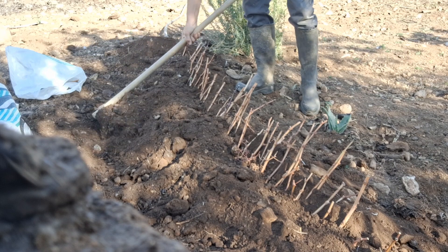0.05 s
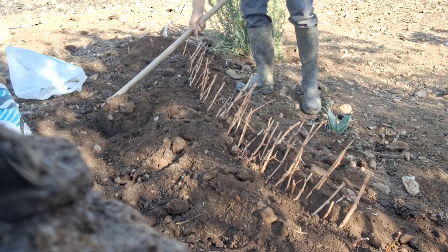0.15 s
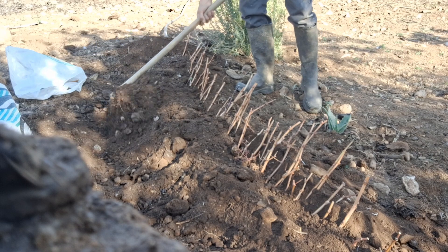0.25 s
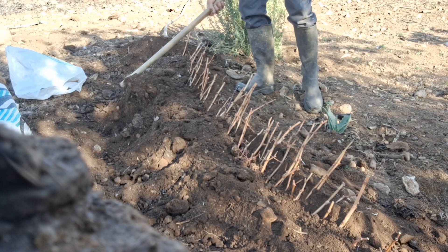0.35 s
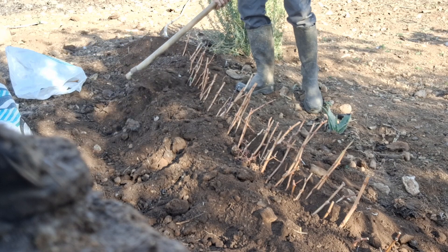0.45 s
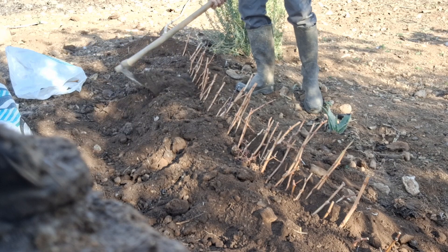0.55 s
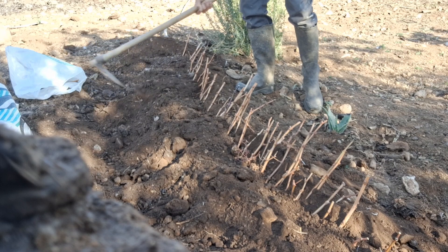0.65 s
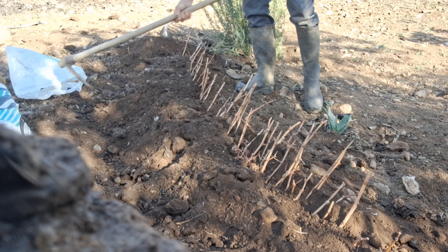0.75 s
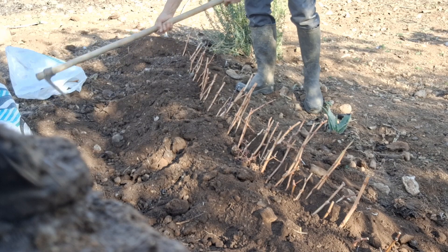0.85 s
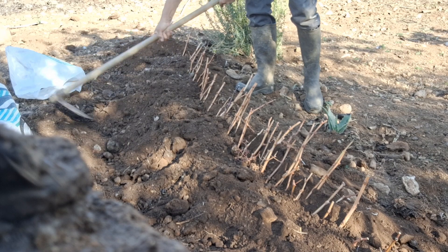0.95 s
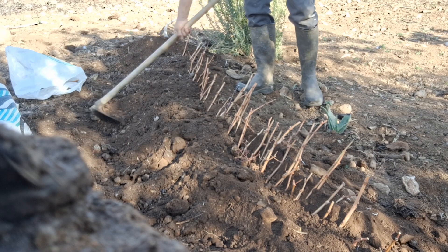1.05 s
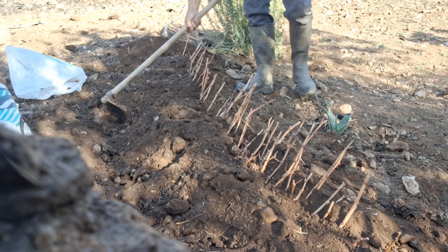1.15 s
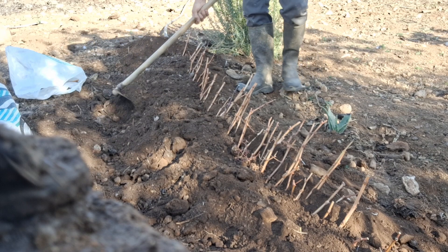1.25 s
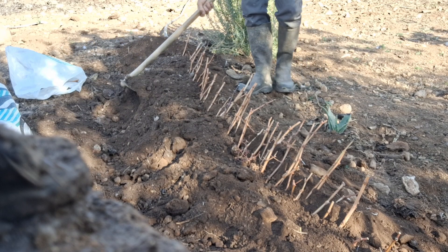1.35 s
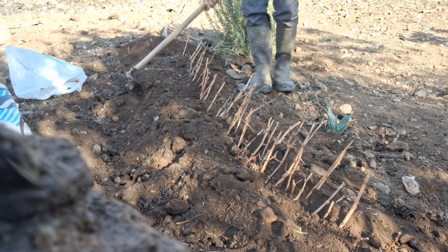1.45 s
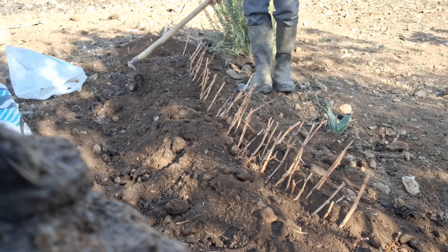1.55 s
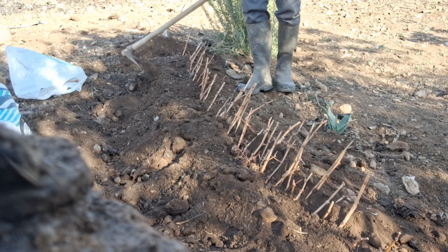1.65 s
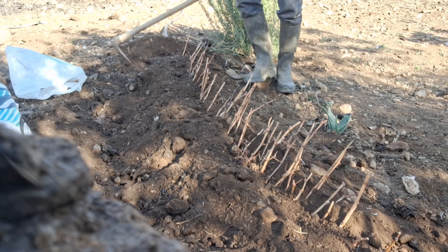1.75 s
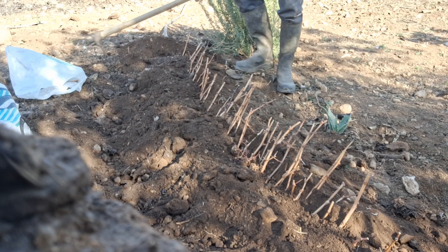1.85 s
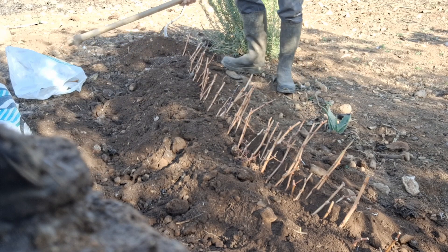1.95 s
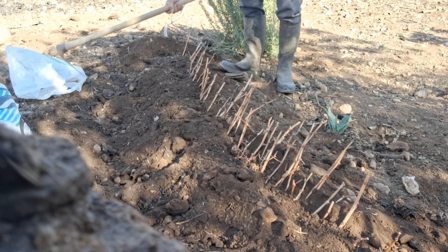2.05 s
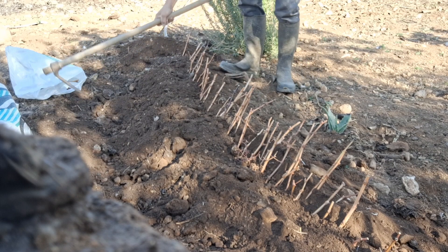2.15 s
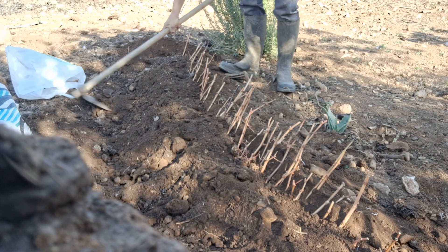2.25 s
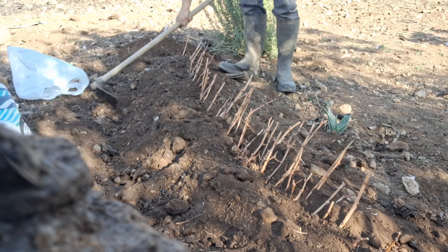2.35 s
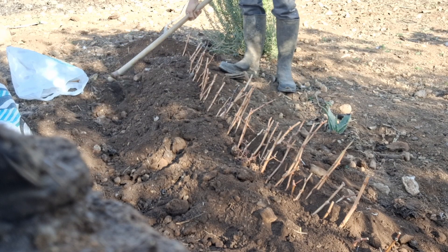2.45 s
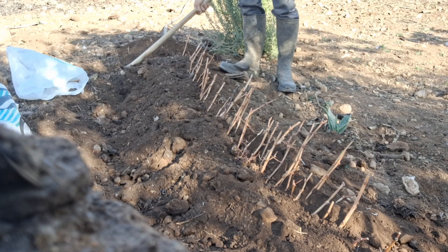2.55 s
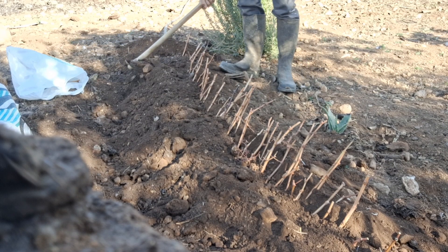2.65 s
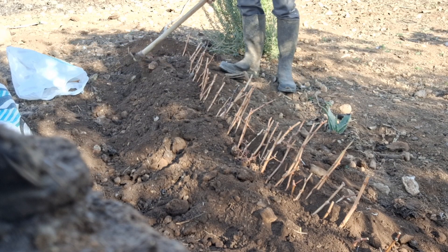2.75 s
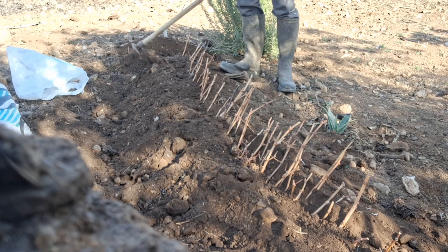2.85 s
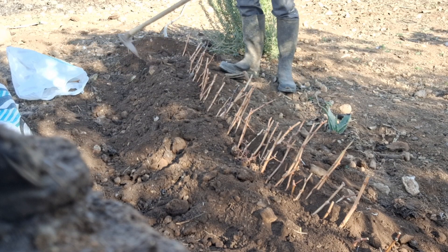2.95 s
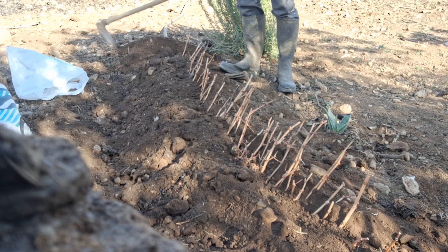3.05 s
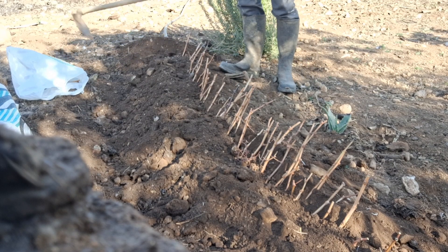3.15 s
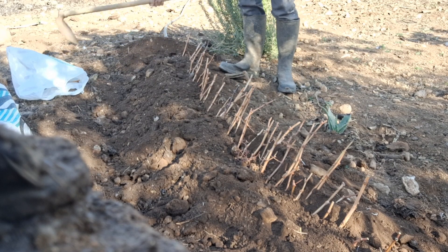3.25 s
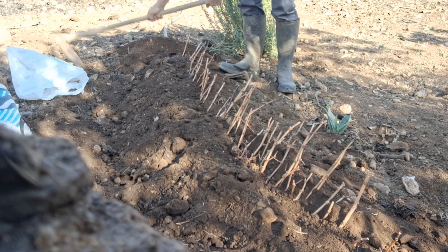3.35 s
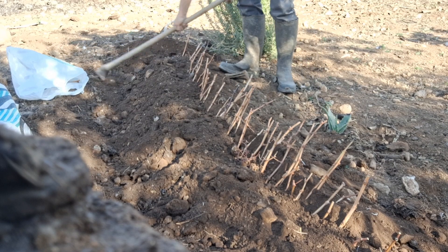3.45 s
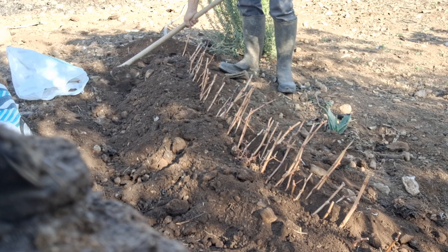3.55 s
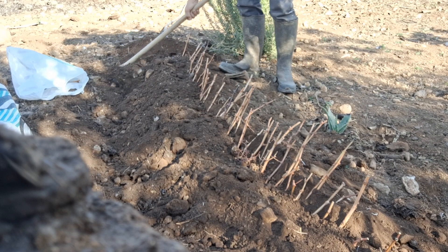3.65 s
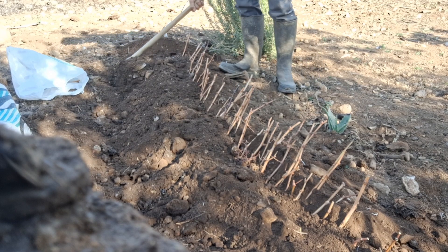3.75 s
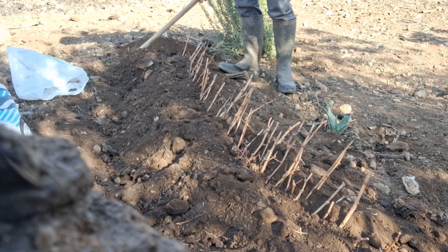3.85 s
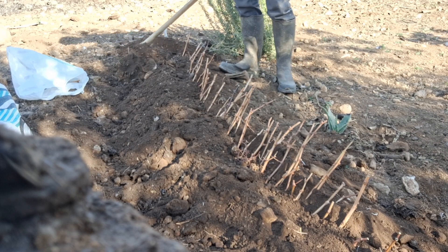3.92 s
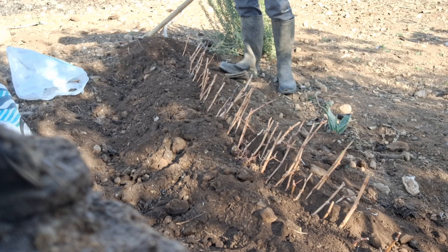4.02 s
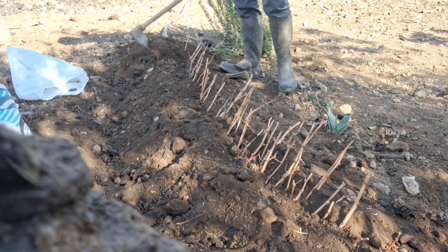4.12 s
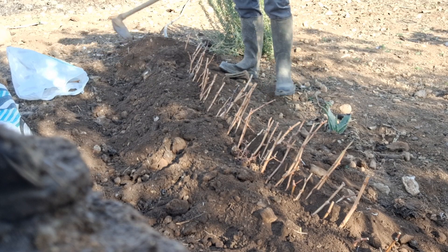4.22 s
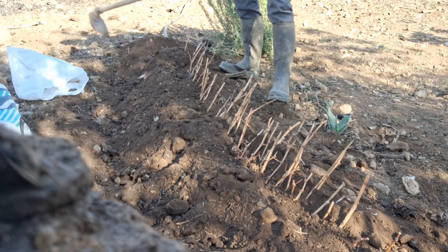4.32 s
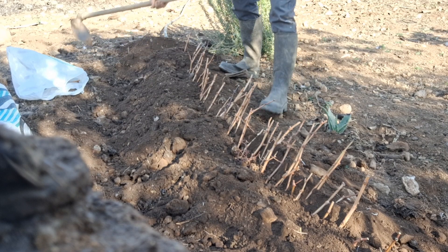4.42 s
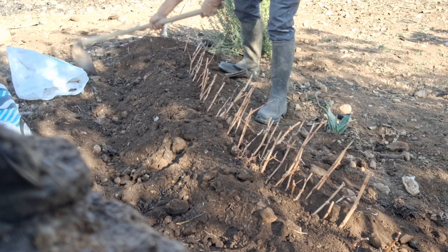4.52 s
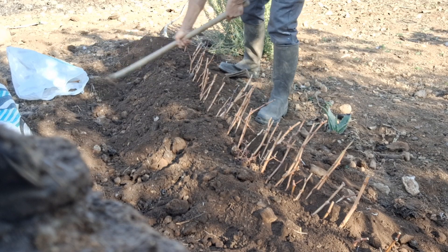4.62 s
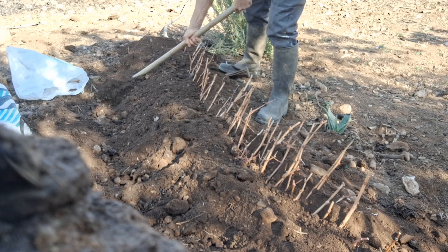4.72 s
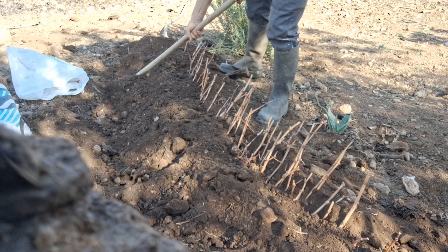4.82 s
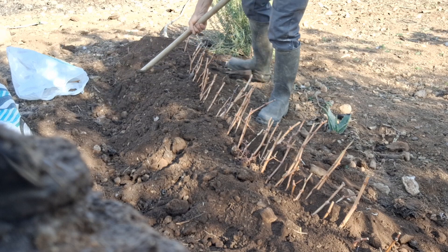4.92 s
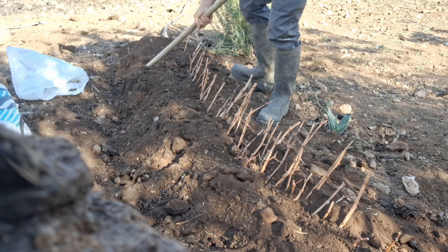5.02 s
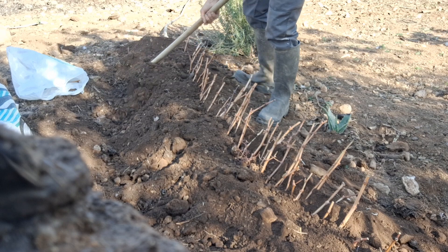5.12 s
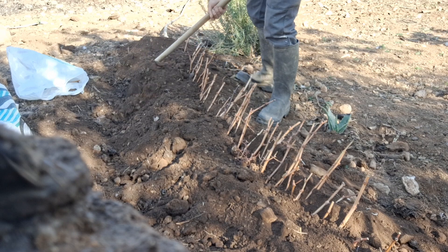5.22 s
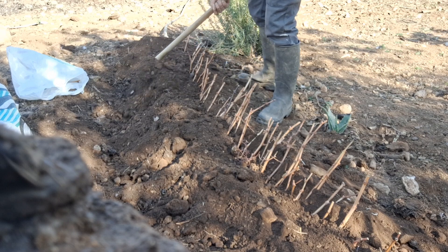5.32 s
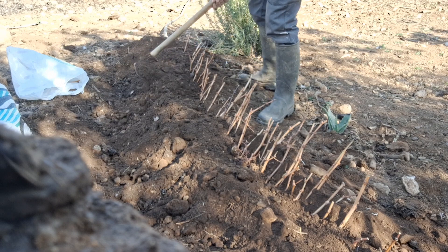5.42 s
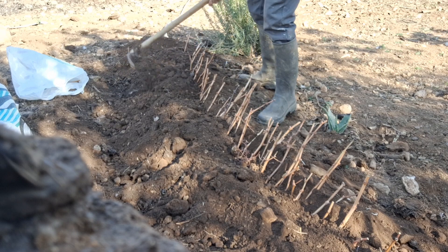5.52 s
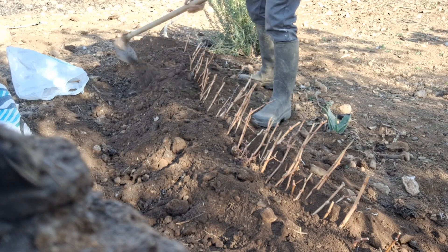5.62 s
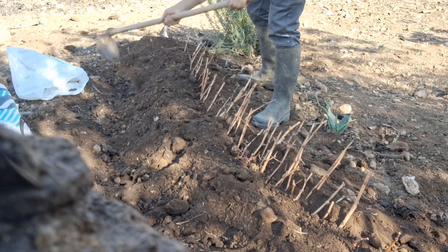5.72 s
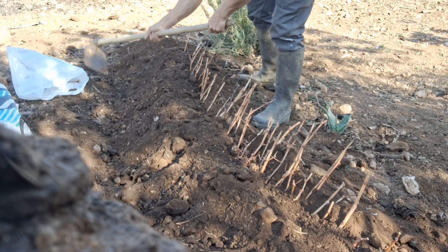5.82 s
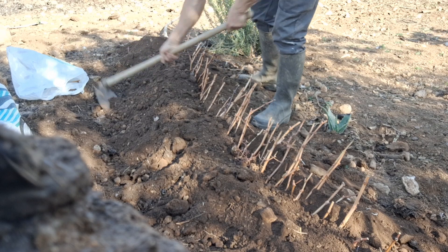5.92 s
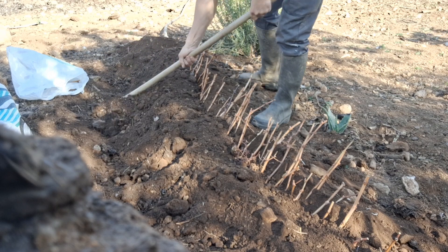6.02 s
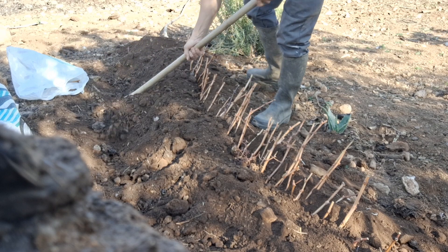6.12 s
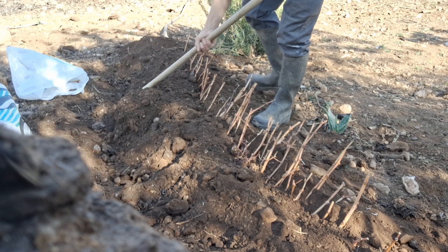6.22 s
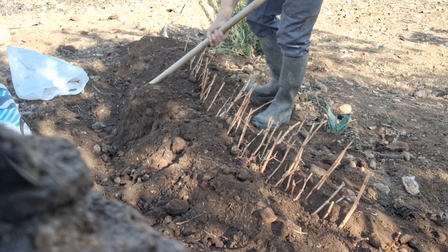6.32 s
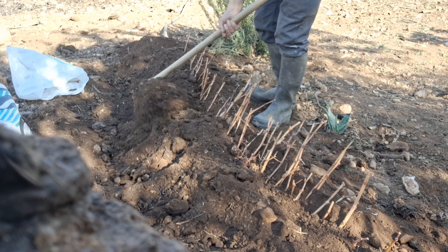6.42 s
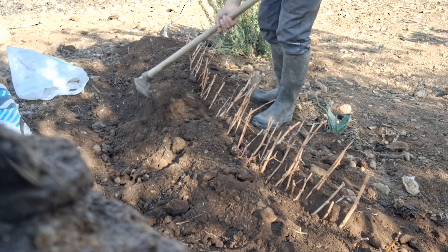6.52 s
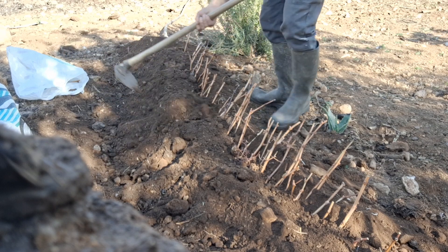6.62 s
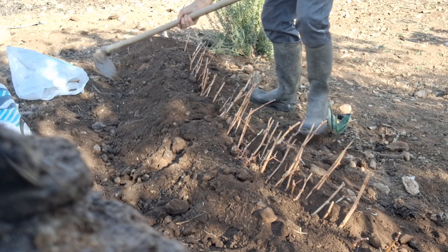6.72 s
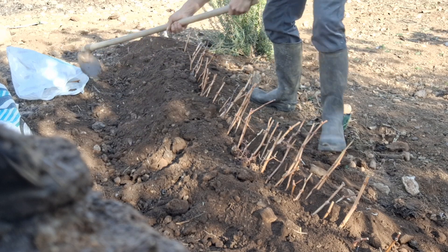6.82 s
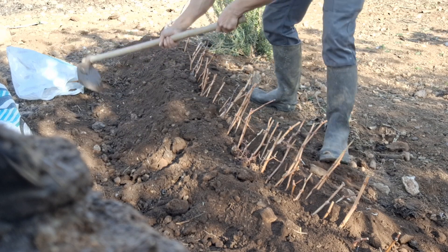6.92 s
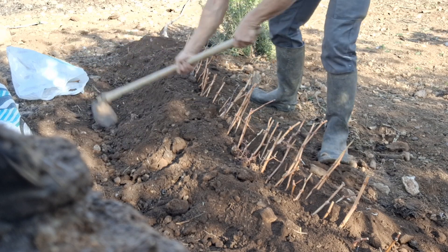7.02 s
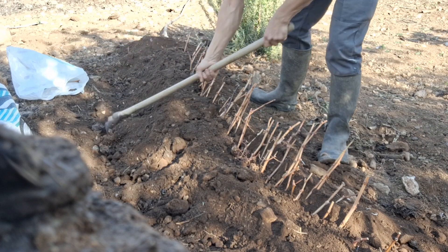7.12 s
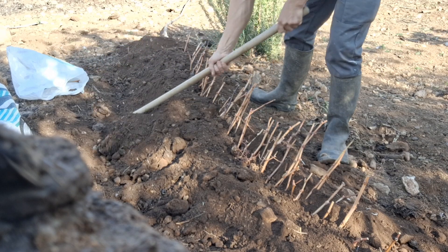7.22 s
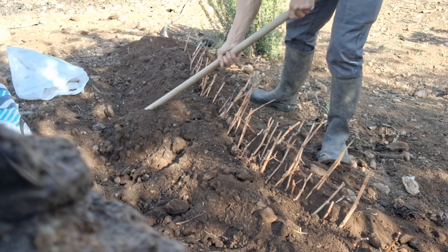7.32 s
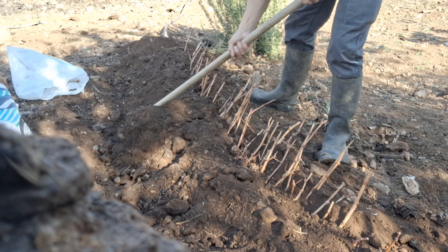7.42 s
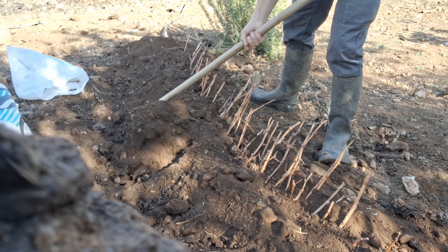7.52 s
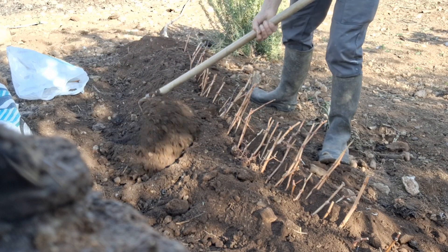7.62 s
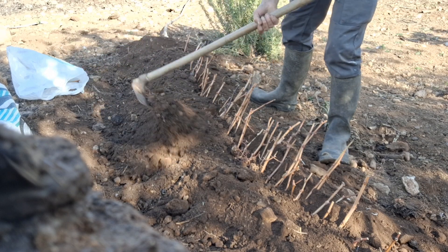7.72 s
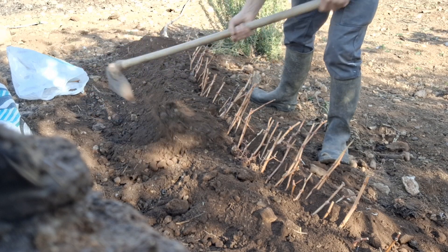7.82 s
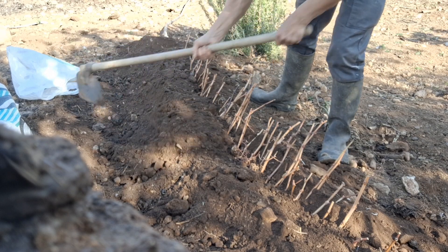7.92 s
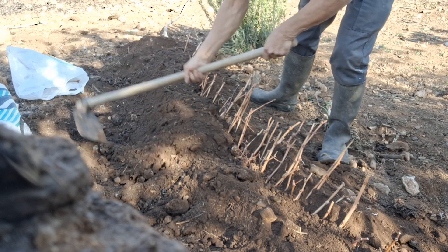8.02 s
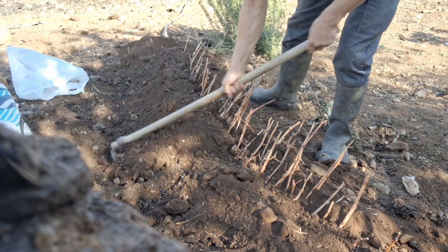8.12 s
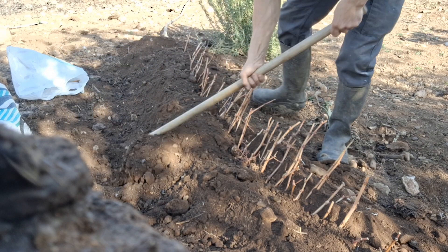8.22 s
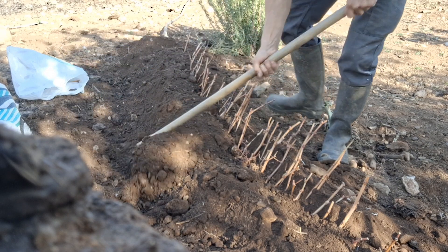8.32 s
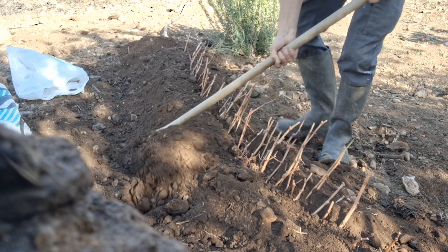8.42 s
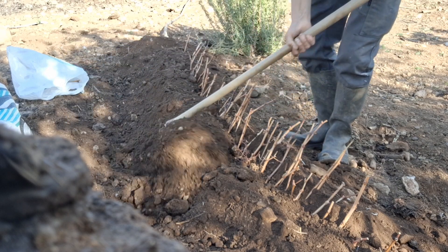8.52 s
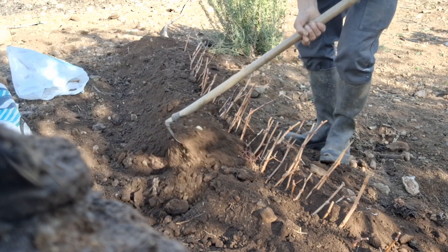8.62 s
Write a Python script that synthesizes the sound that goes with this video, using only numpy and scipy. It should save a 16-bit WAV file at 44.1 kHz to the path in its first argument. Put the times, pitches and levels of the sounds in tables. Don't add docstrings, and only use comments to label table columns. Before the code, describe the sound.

Steady gritty hoe strokes outdoors: sharp stone cracks, short metallic pings, crunching drags and soft clod thuds over faint road rumble and distant birds.

```python
import sys
import numpy as np
from scipy import signal
from scipy.fft import rfft, irfft
from scipy.io import wavfile
from scipy.ndimage import uniform_filter1d

SR = 44100
rng = np.random.default_rng(int(sys.argv[2]) if len(sys.argv) > 2 else 0)


def decibels_to_gain(level_db):
    exponent = np.asarray(level_db, float) / 20
    return 10 ** exponent


def master(y):
    cut = np.clip(np.atleast_2d(y).T, -1, 1)
    pcm = np.round(cut * 32767)
    wavfile.write(sys.argv[1], SR, pcm.astype(np.int16))


N = 382347
T = np.arange(N) / SR

# [f/Hz, level/dB per Hz]
AIR_SPECTRUM = [(20, -16), (65, 7), (130, -7), (190, -15.5), (680, -34.5), (3800, -37), (7310, -33.5),
                (8410, -42.5), (16000, -40)]
# [t/s, cycle rate f/Hz, level/dB]
ENGINE_TRACK = [
    (2.199, 21.35, -99),
    (2.602, 22.2, -68.5),
    (3.499, 23.85, -67),
    (4.401, 25.93, -65.5),
    (5.698, 26.07, -63),
    (6.901, 25, -69),
    (7.799, 25.2, -78.5),
    (8.601, 24.44, -92.5),
]
# [multiple of cycle rate, level/dB]
ENGINE_HARMONICS = [
    (5, 3),
    (6, -4.5),
]
# [start t/s, length t/s, start f/Hz, end f/Hz, level/dB]
VEHICLE_WHINES = [(0.5, .5, 1800, 1900, -82), (1.28, .24, 2950, 2850, -75), (2.7, .3, 810, 740, -73),
                  (2.95, .2, 740, 720, -79), (3.12, .22, 760, 870, -74), (3.3, .15, 740, 800, -74),
                  (3.5, .65, 760, 750, -75), (3.85, .3, 920, 900, -75), (4.07, .07, 1400, 1800, -73),
                  (4.11, .1, 1850, 1950, -71), (4.08, .13, 880, 760, -65), (6.58, .28, 1980, 1900, -72),
                  (7.56, .13, 1700, 1950, -73), (8.3, .36, 1900, 1850, -79)]
# [start t/s, length t/s, start f/Hz, end f/Hz, level/dB]
BIRD_CALLS = [(.09, .04, 4550, 4150, -66), (.19, .045, 4000, 3650, -65), (.242, .035, 3550, 3500, -66),
              (.35, .06, 3700, 3300, -72), (.54, .07, 4100, 4050, -75), (.775, .08, 5100, 4200, -69),
              (.78, .09, 4500, 3500, -66), (.76, .14, 3900, 3000, -67), (1.0, .04, 4900, 5000, -67),
              (2.06, .03, 4300, 4100, -67), (2.09, .05, 3900, 3800, -68), (2.11, .15, 3300, 3000, -74),
              (2.57, .11, 4450, 4350, -77), (2.64, .1, 3700, 3000, -71), (3.55, .12, 5100, 4900, -70),
              (3.73, .03, 3200, 3100, -73), (3.72, .03, 5000, 4700, -72), (3.17, .1, 4300, 3300, -70),
              (3.18, .11, 3700, 3000, -71)]
# [f/Hz, level/dB per Hz]
BAG_SPECTRUM = [(880, -44.5), (1940, -6), (2880, -11), (4330, -5.5), (7030, 0), (8570, -9.5), (15100, -5),
                (16000, -12)]
# [start t/s, length t/s, level at the start of the fade/dB]
BAG_STIRS = [(1.26, 0.36, -70), (1.558, 0.13, -53.5), (1.647, 0.18, -66), (1.703, 0.18, -63),
             (1.752, .1, -92), (1.831, .25, -66), (2.103, .04, -65.5), (2.04, 0.25, -71),
             (2.678, 0.13, -61), (2.91, 0.24, -71.5), (3.145, 0.083, -69), (3.357, 0.37, -66.5),
             (4.03, 0.24, -69.5), (4.185, 0.14, -66), (5.005, 0.087, -62.5), (5.357, 0.093, -62),
             (5.491, 0.22, -68.5), (6.2, .2, -69), (6.74, 0.25, -69.5), (7.824, 0.12, -83),
             (8.467, 0.14, -68)]
# [t/s, peak level/dB, f/Hz, decay t60/s]
CREASE_TICKS = [(0.346, -52, 6600, .012), (.421, -62, 3900, .015), (0.4437, -47, 4300, .012),
                (.458, -59, 4830, 0.016), (0.92, -52, 4560, 0.0053), (.935, -57, 4640, 0.013),
                (1.228, -58, 6000, .006), (1.3275, -55, 6560, .012), (1.3494, -52, 7150, 0.048),
                (1.3961, -58.5, 5830, 0.013), (1.408, -57, 5100, .02), (1.4779, -67, 4570, 0.018),
                (1.578, -55.5, 7000, 0.021), (1.5872, -46, 6500, .03), (1.592, -53, 3030, .025),
                (1.647, -49.5, 5200, 0.015), (1.693, -50.5, 6800, 0.025), (1.7216, -54.5, 7030, .03),
                (1.733, -50, 6800, .04), (1.8434, -50.5, 6660, .04), (1.9049, -52, 4600, 0.011),
                (1.9548, -64.5, 6660, .04), (2.0117, -62.5, 7100, 0.012), (2.051, -52, 7350, 0.025),
                (2.068, -52.5, 4220, .015), (2.153, -57, 6940, .02), (2.7132, -53, 5000, 0.036),
                (2.9492, -53, 6750, 0.013), (3.173, -47.5, 6770, 0.0087), (3.378, -52, 6800, 0.0067),
                (3.631, -58, 7990, .007), (4.012, -59.5, 6390, 0.005), (4.2356, -43.5, 8250, 0.0071),
                (4.2581, -46, 7780, .01), (4.797, -35.5, 5720, 0.007), (4.8028, -35.5, 5120, 0.013),
                (5.3825, -35.5, 7190, 0.028), (5.514, -54, 8450, 0.0074), (5.5486, -50, 6420, 0.0082),
                (6.134, -54.5, 6425, 0.01), (6.777, -50, 6540, 0.0095), (7.858, -59.5, 7310, 0.014),
                (8.3, -56, 6000, 0.0063), (8.3533, -53.5, 7780, 0.016)]
# [loudest t/s, half length t/s, trickling earth level/dB, soft clods and boots level/dB]
EARTH_SLIDES = [(0.192, 0.098, -72.5, -80.5), (0.355, 0.047, -87, -70.5), (1.336, 0.098, -77, -92),
                (1.628, 0.22, -80, -88), (2.055, 0.6, -89, -91.5), (2.609, 0.19, -82.5, -93),
                (3.805, 0.11, -81.5, -91), (4.092, 0.13, -74, -89.5), (4.534, 0.045, -93.5, -71),
                (5.016, 0.068, -69, -74), (5.259, 0.12, -74, -66), (5.4, 0.032, -62, -74),
                (5.586, 0.093, -75.5, -83), (6.283, 0.28, -79, -74.5), (6.66, 0.14, -81, -82.5),
                (6.98, 0.03, -82.5, -63), (7.576, 0.078, -78.5, -77.5), (8.033, 0.031, -95, -74),
                (8.543, 0.061, -65.5, -64.5)]
# [t/s, peak level/dB, thud f/Hz, scuff level above thud/dB]
CLOD_FALLS = [(1.333, -41.5, 289, 0.5), (1.4, -48, 343, 6), (1.729, -48.5, 120, -0.5),
              (1.845, -47, 131, 16), (2.013, -44.5, 107, -6), (2.058, -41, 207, 2), (4.504, -36, 137, 0),
              (4.97, -48.5, 240, -16.5), (4.984, -43, 255, 15.5), (6.183, -50, 224, -20.5),
              (6.294, -43, 109, -4), (6.33, -44, 243, -3), (6.597, -50, 126, -4.5), (6.753, -50, 124, -6),
              (6.903, -41.5, 124.4, -28), (6.956, -45, 413, 0.5), (8.294, -47, 197.5, 1.5),
              (8.502, -38.5, 115.5, 1.5)]
# [loudest t/s, half length t/s, level/dB, centre f/Hz]
DUST_SHOWERS = [(0.052, 0.19, -70, 3440), (0.184, 0.085, -74, 2180), (0.41, 0.25, -89.5, 3480),
                (1.205, 0.054, -72.5, 4970), (1.61, 0.034, -72.5, 2810), (3.603, 0.043, -69, 3975),
                (3.931, 0.075, -80, 1196), (4.103, 0.028, -77, 1442), (5.065, 0.085, -80, 1610),
                (5.043, 0.047, -68, 5800), (5.574, 0.062, -71, 5480), (5.69, 0.03, -77.5, 6350),
                (2.738, 0.033, -70, 5000), (3.04, 0.062, -83.5, 6800), (3.346, 0.032, -72.5, 7520),
                (3.402, 0.022, -66, 6050), (4.819, 0.031, -68, 6030), (1.75, 0.26, -73.5, 11500),
                (6.254, 0.082, -77, 4600), (6.277, 0.062, -73, 7000), (5.553, 0.039, -69, 3400),
                (6.81, 0.084, -74, 4524), (7.6, 0.15, -85, 1487), (7.88, 0.068, -77, 7440)]
# [t/s, peak level/dB, f/Hz, decay t60/s]
STONE_CLACKS = [(.012, -52, 1220, 0.033), (.023, -53, 460, 0.017), (0.138, -48.5, 1173, 0.026),
                (.159, -55, 1120, 0.043), (1.336, -58, 770, 0.01), (1.619, -66, 950, 0.12),
                (1.619, -59, 3090, .04), (1.766, -71, 1000, 0.019), (1.806, -66, 990, 0.081),
                (1.831, -61, 960, 0.048), (2.322, -43, 750, 0.032), (2.405, -52.5, 440, 0.035),
                (4.992, -58, 550, 0.015), (5.291, -73, 1197, 0.018), (5.42, -65, 896, 0.019),
                (7.216, -21.5, 2020, 0.012), (7.26, -43, 2250, 0.014), (8.181, -25.5, 2370, 0.016),
                (5.964, -40.5, 955, 0.21), (5.965, -37.5, 5740, 0.044), (5.983, -44, 5900, 0.063),
                (1.245, -35.5, 3090, 0.021), (1.247, -48.5, 920, 0.068), (1.246, -47, 6800, 0.079),
                (2.295, -24, 3040, 0.024), (2.487, -48, 3220, 0.067), (7.091, -28, 5140, 0.036),
                (4.62, -36, 1117, 0.031), (7.115, -21.5, 1173, 0.012), (8.202, -35.5, 2300, 0.0081),
                (5.506, -67, 2600, 0.061)]
# [start t/s, drag t/s, grit level/dB, fine sand level above grit/dB, weight of earth level/dB]
BLADE_PULLS = [(0.0, 0.032, -61, 0.5, -52.5), (0.051, 0.15, -79, 7.5, -63), (1.034, 0.044, -64, 15.5, -48),
               (1.066, 0.08, -39.5, -2.5, -49.5), (1.246, 0.0084, -48, -7, -54),
               (2.261, 0.039, -67, 12, -57), (2.288, 0.05, -43, 5.5, -42), (2.364, 0.27, -55, 7.5, -54),
               (3.427, 0.086, -43, 9.5, -43.5), (3.529, 0.17, -59.5, 0, -79.5),
               (4.606, 0.055, -43, 6.5, -42.5), (4.67, 0.086, -53, -8, -50.5),
               (5.959, 0.053, -50, 6.5, -44.5), (6.038, 0.031, -54, -4, -58), (7.067, 0.051, -47, 7.5, -42),
               (7.158, 0.035, -52.5, 3, -49), (7.217, 0.041, -59.5, -4, -67), (8.082, 0.1, -44.5, 1.5, -44),
               (8.18, 0.062, -57, -5.5, -59.5)]
# [f/Hz, level/dB, decay t60/s]
BLADE_MODES = [(936, -5, 0.09), (1173.3, -8.5, 0.075), (1440, -9, 0.05), (1580, -5, 0.18), (1971, 3, 0.1),
               (2300, -4, 0.046), (2600, -8, 0.02), (3090, 1, 0.07), (3916, -3.5, 0.04), (4536, 1.5, 0.061),
               (5000, -2, 0.13), (5740, -4.5, 0.022), (6620, -7, 0.039), (6800, 1, 0.11)]
# [t/s, peak level/dB, stone f/Hz, crack t60/s]
BURIED_STONES = [(1.068, -18, 3090, 0.0051), (2.294, -9, 6294, 0.03), (2.312, -25, 5810, .05),
                 (3.429, -5.5, 4253, 0.059), (3.4435, -7.5, 3100, 0.066), (3.49, -22.5, 3353, 0.074),
                 (3.505, -18, 4780, 0.046), (4.62, -18, 2015, 0.076), (4.634, -17.5, 2416, 0.023),
                 (4.647, -12.5, 2810, 0.023), (4.674, -26, 2090, 0.066), (4.692, -27, 2250, 0.032),
                 (4.725, -37, 1200, 0.045), (6.001, -14.5, 1790, 0.024), (6.028, -24.5, 2860, 0.032),
                 (6.047, -38, 2000, .03), (7.086, -31, 4710, 0.027), (7.067, -20.5, 3400, 0.043),
                 (7.09, -13.5, 1722, 0.04), (7.099, -21.5, 1730, 0.012), (7.113, -13, 1880, 0.022),
                 (7.164, -24.5, 1637, 0.013), (7.19, -31.5, 1690, 0.024), (7.216, -30, 2770, 0.013),
                 (7.234, -41, 1604, 0.015), (7.26, -39.5, 4000, 0.029), (8.081, -26, 6160, .04),
                 (8.087, -29.5, 2004, 0.043), (8.105, -25.5, 2600, 0.023), (8.112, -19, 4287, 0.032),
                 (8.119, -28, 4200, 0.082), (8.13, -24.5, 5000, .03), (8.18, -30, 3200, 0.069),
                 (8.192, -34, 2444, 0.024), (8.202, -37, 4980, 0.019), (8.266, -44, 2500, 0.064)]
# [t/s, peak level/dB, stone f/Hz, crack t60/s]
EDGE_SCRAPES = [
    (2.275, -36, 5930, 0.1),
    (2.376, -51.5, 5030, 0.048),
    (2.404, -44, 4160, 0.085),
    (4.607, -37, 4550, 0.078),
    (6.062, -42.5, 2440, 0.092),
    (7.157, -27.5, 2057, 0.059),
    (8.138, -27, 2807, 0.083),
]
# [t/s, peak level/dB, stone f/Hz, crack t60/s]
FREE_PINGS = [(1.246, -33, 2960, 0.011), (1.258, -44, 3320, 0.095), (1.098, -33, 6400, 0.073),
              (1.145, -52, 2000, .09), (1.198, -52.5, 4480, 0.066), (2.463, -48.5, 5000, 0.071),
              (2.479, -33, 3170, 0.11), (3.725, -65.5, 4120, 0.16), (3.958, -58, 1850, 0.026),
              (4.955, -54.5, 1527, 0.019), (5.382, -42.5, 1780, 0.035), (5.52, -59, 1400, 0.17),
              (5.554, -56, 1300, 0.16), (5.964, -24, 1500, 0.11), (5.966, -31.5, 4950, .06),
              (5.98, -27, 4350, .05), (5.987, -27, 1410, 0.062), (6.142, -46.5, 2200, 0.1),
              (8.498, -50, 1444, 0.048), (8.53, -48, 2090, 0.012)]
# [f/Hz, level/dB]
MIC_RESPONSE = [(20, 8), (2000, 4.5), (5000, 2), (7000, 3), (7700, 0.5), (8500, -11.5), (12000, -8),
                (16000, -12)]
# [f/Hz, left minus right level/dB]
PORT_LEVEL = [(60, 4.5), (700, 2), (1290, 3), (2380, 4.5), (4400, 8.5), (8120, 9), (15000, 5)]
# [f/Hz, lead of the left/rad]
PORT_PHASE = [(0, 0), (3270, -.4), (3800, -2.2), (4900, -3), (6630, -2.8), (8010, -6.2), (16400, -9)]
# [f/Hz, common share 0-1]
PORT_COHERENCE = [(60, 1), (500, 0.94), (2000, 0.7), (8000, 0.1)]

BURIED_RING_DB, SCRAPED_RING_DB, FREE_RING_DB = -1, -5, -1.5
RING_DB_PER_OCTAVE = 1
BITE_S, SAG_DB_PER_S, LET_GO_T60_S = 0.0062, 154.5, 0.093
HEAVE_S, SLUMP_T60_S = 0.02, 0.12
CRUMBLE_DB, CRUMBLE_T60_S = -3.5, 0.053


def curve(table, hz):
    f, v = np.transpose(table)
    return np.interp(np.log(hz + 1), np.log(f + 1), v)


def colour(x, table):
    cep = irfft(curve(table, np.linspace(0, SR / 2, 2049)) * np.log(10) / 20)
    cep[1:2048] *= 2
    cep[2049:] = 0
    response = irfft(np.exp(rfft(cep))).reshape((1,) * (x.ndim - 1) + (-1,))
    return signal.fftconvolve(x, response, axes=-1)[..., :x.shape[-1]]


def band(x, lo_hz, hi_hz, order=2):
    sos = signal.butter(order, [lo_hz, min(hi_hz, 0.45 * SR)], "band", fs=SR, output="sos")
    y = signal.sosfilt(sos, x)
    return y / np.sqrt(np.mean(y ** 2))


def walk(rate):
    k = int(SR / rate)
    held = np.repeat(rng.standard_normal(N // k + 1), k)
    slewed = uniform_filter1d(uniform_filter1d(held, k), k)[:N]
    return slewed / np.std(slewed)


def grains(rate, spread_db, hiss):
    when, size = rng.random(N), rng.exponential(size=N)
    noise = rng.standard_normal((2, 2, N))
    hits = (when < rate / SR) * decibels_to_gain(spread_db * np.minimum(size, 4)) * noise[0]
    return hits / np.sqrt(np.mean(hits ** 2)) + hiss * noise[1]


def add(out, s, x, peak_db):
    i = int(s * SR)
    scaled = x * decibels_to_gain(peak_db) / np.abs(x[0]).max()
    out[:, i:i + x.shape[1]] += scaled[:, :N - i]


def fade(t, t60):
    return np.exp(-np.log(1000) * t / max(t60, 0.003))


def swell(s, half):
    return np.exp(-((T - s) / half) ** 2)


def ports(x, left_db=0, alike=1):
    hz = np.fft.rfftfreq(N, 1 / SR)
    db = curve(PORT_LEVEL, hz) + left_db * np.minimum(hz / 2000, 1)
    same = np.clip(curve(PORT_COHERENCE, hz) * alike, 0, 1)
    one, two = rfft(x)
    lag = np.exp(-1j * np.interp(hz, *np.transpose(PORT_PHASE)))
    right = same * one * lag + np.sqrt(1 - same ** 2) * two
    return irfft([one * decibels_to_gain(db / 2), right * decibels_to_gain(-db / 2)], N)


def echoes(x, level_db=-32, t60=0.2):
    t = T[:SR // 3]
    tail = rng.standard_normal((2, len(t))) * fade(t, t60) * np.minimum(t / 0.017, 1)
    tail = tail / np.sqrt(np.sum(tail ** 2) / 2)
    return x + decibels_to_gain(level_db) * signal.fftconvolve(x, tail, axes=1)[:, :N]


def air():
    shared, left, right = colour(rng.standard_normal((3, N)), AIR_SPECTRUM)
    low = signal.butter(1, 300, fs=SR, output="sos")
    own = np.array([left, right])
    rumble = signal.sosfilt(low, shared + 0.16 * own) * decibels_to_gain(2 * walk(2.3))
    hiss = ports(own - signal.sosfilt(low, own), -6, 0.44) * decibels_to_gain(1.2 * walk(2.9))
    bed = rumble + hiss
    return bed / np.std(bed) * decibels_to_gain(-60 + np.array([[0.5], [-0.5]]) * 4.5)


def engine():
    s, hz, db = np.transpose(ENGINE_TRACK)
    turns = np.cumsum(np.interp(T, s, hz) * (1 + 0.025 * walk(12))) / SR
    tone = sum(decibels_to_gain(d - 4 + 4 * walk(9)) * np.sin(2 * np.pi * k * turns) for k, d in ENGINE_HARMONICS)
    return tone * decibels_to_gain(np.interp(T, s, db)) * decibels_to_gain(np.array([[1.5], [-1.5]]))


def glides(table):
    out, waver = np.zeros((2, N)), 1 + 0.025 * walk(14)
    for s, length, hz0, hz1, db in table:
        i, t = int(s * SR), T[:int(length * SR)]
        width_hz = 0.09 * hz0 + 0.5 * abs(hz1 - hz0)
        noise = rng.standard_normal((2, N // 8))
        blur = uniform_filter1d(noise, int(SR / width_hz))[:, :len(t)] * np.sqrt(SR / width_hz)
        hz = (hz0 + (hz1 - hz0) * t / t[-1]) * waver[i:i + len(t)]
        tone = np.sin(2 * np.pi * np.cumsum(hz) / SR)
        direct = 0.62 * min(1, 0.15 * hz0 / width_hz) ** 2
        envelope = np.abs(np.sin(np.pi * t / t[-1])) ** 0.8
        balance = np.array([[1.3], [0.7]])
        out[:, i:i + len(t)] += decibels_to_gain(db) * (direct + 0.8 * blur) * tone * envelope * balance
    return out


def whines():
    return glides(VEHICLE_WHINES)


def birds():
    return echoes(glides(BIRD_CALLS), -1.5, 0.17)


def bag():
    stir = np.zeros(N)
    for s, length, db in BAG_STIRS:
        t = np.maximum(T - s, 0)
        stir += decibels_to_gain(db) * np.minimum(t / 0.14, 1) * np.exp(-1.5 * (t / length) ** 2)
    crackle = colour(grains(1800, 2.8, 0.9) * decibels_to_gain(2.2 * walk(70)), BAG_SPECTRUM)
    return stir * crackle / np.std(crackle)


def ticks():
    out, t = np.zeros((2, N)), T[:2500]
    noises = rng.standard_normal((len(CREASE_TICKS), 2, len(t)))
    for (s, db, hz, t60), noise in zip(CREASE_TICKS, noises):
        burst = noise * fade(t, t60) * np.minimum(t / (0.08 * t60), 1)
        crease = band(burst, hz / 1.2, hz * 1.25, order=3)
        sparkle = 1.1 * (hz / 7000) ** 3 * band(burst, 4200, 24000)
        add(out, s, crease + sparkle, db)
    return out


def settle():
    swells = [swell(s, half) for s, half, _, _ in EARTH_SLIDES]
    run = decibels_to_gain(-88) + sum(decibels_to_gain(row[2]) * w for row, w in zip(EARTH_SLIDES, swells))
    drop = decibels_to_gain(-94) + sum(decibels_to_gain(row[3]) * w for row, w in zip(EARTH_SLIDES, swells))
    trickle = run * decibels_to_gain(-2.5 + 2.04 * walk(30)) * band(grains(500, 3, 0.9), 420, 1350, order=3)
    slump = drop * decibels_to_gain(3 + 3 * walk(25)) * band(grains(250, 3.5, 0.5), 190, 420)
    return trickle + slump


def clods():
    out, t = np.zeros((2, N)), T[:4000]
    noises = rng.standard_normal((len(CLOD_FALLS), 2, len(t)))
    for (s, db, hz, scuff_db), noise in zip(CLOD_FALLS, noises):
        body = np.sin(2 * np.pi * hz * t) * fade(t, 5 / hz + 0.048)
        scuff = 0.5 * decibels_to_gain(scuff_db) * band(noise, 100, 480, order=3) * fade(t, 0.11)
        add(out, s, (body + scuff) * np.minimum(t / 0.0025, 1), db)
    return out


def dust():
    out, rain = np.zeros((2, N)), grains(1500, 2.9, 1.4) * decibels_to_gain(1.8 * walk(54))
    for s, half, db, hz in DUST_SHOWERS:
        part = slice(max(int((s - 2.5 * half) * SR), 0), int((s + 2.5 * half) * SR))
        shower = band(rain[:, part], hz / 1.45, hz * 1.45, order=3)
        out[:, part] += decibels_to_gain(db) * swell(s, half)[part] * shower
    return out


def clacks():
    out, t = np.zeros((2, N)), T[:5000]
    noises = rng.standard_normal((len(STONE_CLACKS), 2, len(t)))
    for (s, db, hz, t60), noise in zip(STONE_CLACKS, noises):
        note = np.sin(2 * np.pi * hz * t) * fade(t, t60)
        rough = band(noise * fade(t, t60), hz / 1.2, hz * 1.2)
        contact = note + 1.2 * rough / np.abs(rough).max()
        add(out, s, contact * np.minimum(t / 0.00014, 1), db)
    return out


def ring(t, tilt_hz, luck):
    hz, db, t60 = np.transpose(BLADE_MODES)[:, :, None]
    octaves_off = np.abs(np.log2(hz / (0.95 * tilt_hz)))
    share = decibels_to_gain(db + 2.5 * luck[:, :1] - 9 * octaves_off)
    modes = np.sin(2 * np.pi * hz * (1 + 0.007 * luck[:, 1:]) * t)
    return np.sum(share * modes * np.exp(-np.log(1000) * t / t60), axis=0)


def pull(s, drag, attack, t60):
    out, i = np.zeros(N), int(s * SR)
    t = T[:min(SR // 2, N - i)]
    hold = decibels_to_gain(-SAG_DB_PER_S * np.minimum(t, drag))
    out[i:i + len(t)] = np.minimum(t / attack, 1) * hold * fade(np.maximum(t - drag, 0), t60)
    return out


def plough():
    bite = [decibels_to_gain(db) * pull(s, drag, BITE_S, LET_GO_T60_S) for s, drag, db, _, _ in BLADE_PULLS]
    sand = sum(decibels_to_gain(row[3]) * b for row, b in zip(BLADE_PULLS, bite))
    crush = sum(decibels_to_gain(db + CRUMBLE_DB) * pull(s, drag, BITE_S, CRUMBLE_T60_S) for s, drag, _, _, db in BLADE_PULLS)
    heave = sum(decibels_to_gain(db) * pull(s, drag, HEAVE_S, SLUMP_T60_S) for s, drag, _, _, db in BLADE_PULLS)
    grit = grains(2500, 3.2, 0.8) * decibels_to_gain(1.3 * walk(80))
    modes = ring(T[:2000], 3000, np.zeros((len(BLADE_MODES), 2)))
    blade = signal.fftconvolve(grit, modes[None], axes=1)[:, :N]
    patches = sum(band(grit, hz, 1.4 * hz) * decibels_to_gain(5 * walk(90)) for hz in 900 * 1.4 ** np.arange(5))
    crunch = 0.74 * patches / np.std(patches) + decibels_to_gain(-7) * blade / np.std(blade)
    hiss = band(grit, 2000, 20000, order=1)
    crumble = band(grains(400, 5, 0.4), 200, 730)
    thump = band(rng.standard_normal((2, N)), 37, 170, order=3)
    return sum(bite) * crunch + sand * hiss + crush * crumble + heave * thump


def knock(t, db, hz, t60, state_db):
    noise = rng.standard_normal((2, len(t)))
    luck = rng.standard_normal((len(BLADE_MODES), 2))
    hard = np.clip((db + 52) / 32, 0.1, 1)
    sharp = min(1, 0.055 / t60) ** 2
    onset = np.minimum(t / (0.0003 + 4 * t60 ** 3), 1)
    burst = noise * (fade(t, t60) + 0.7 * sharp * fade(t, 0.006)) * onset
    stone = band(burst, hz / 1.45, hz * 1.35)
    crack = stone + 1.2 * hard * band(burst, 1200, hz * 3.2)
    snap = band(np.ones((2, 1)) * (t == t[8]), hz / 2, hz * 2.5, order=1)
    crack = crack + 1.5 * sharp * hard * snap * np.abs(crack).max() / np.abs(snap).max()
    crack = band(crack, 750, 19000)
    chatter = noise[:, :300] * fade(t[:300], 0.0067)
    modes = ring(t, hz, luck)[None] * (fade(t, 0.72 * t60) + 0.036)
    blade = signal.fftconvolve(modes, chatter, axes=1)[:, :len(t)]
    blade = band(blade * onset, 880, min(9000, hz * (1.2 + 4 * hard)), order=3)
    ring_db = state_db + RING_DB_PER_OCTAVE * np.log2(hz / 2000)
    return crack / np.abs(crack).max() + decibels_to_gain(ring_db) * blade / np.abs(blade).max()


def knocks():
    out = np.zeros((2, N))
    states = ((BURIED_STONES, BURIED_RING_DB), (EDGE_SCRAPES, SCRAPED_RING_DB), (FREE_PINGS, FREE_RING_DB))
    for table, state_db in states:
        for s, db, hz, t60 in table:
            add(out, s, knock(T[:4500], db, hz, t60, state_db), db - 2.0)
    return out


def scene():
    hoe = echoes(colour(ports(knocks() + clacks() + plough() + dust()), MIC_RESPONSE))
    earth = ports(clods() + settle(), -0.35, 0.16)
    plastic = ports(ticks() + bag(), 3.6, 0.16)
    return hoe + earth + plastic + birds() + whines() + engine() + air()


def low_pass(x):
    return signal.sosfilt(signal.butter(12, 16300, fs=SR, output="sos"), x)


def record(dry):
    bass_cut = signal.butter(3, 36, "high", fs=SR, output="sos")
    top_cut = signal.butter(12, 16300, fs=SR, output="sos")
    mix = signal.sosfilt(np.vstack([bass_cut, top_cut]), dry)
    return low_pass(mix)


dry = scene()
out = record(dry)
master(out)
```